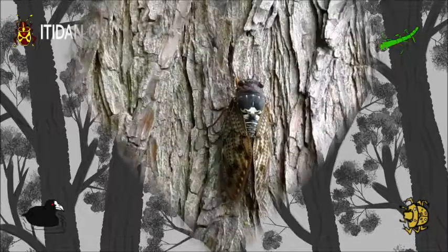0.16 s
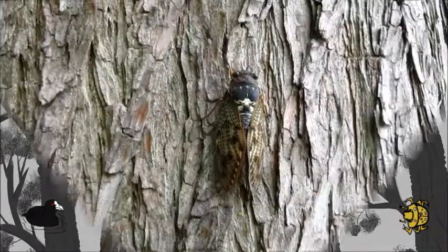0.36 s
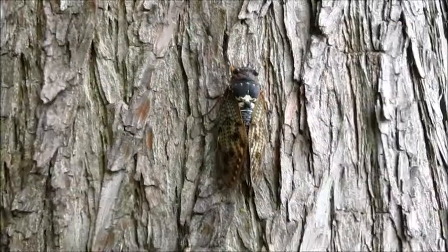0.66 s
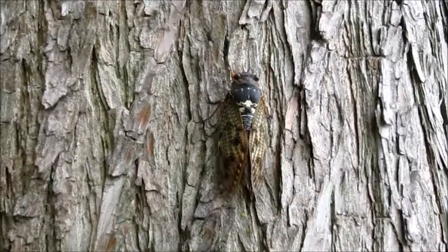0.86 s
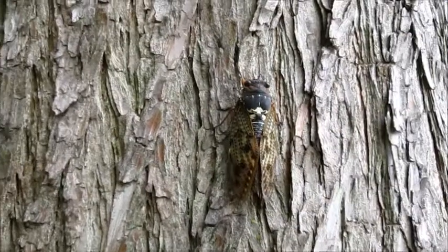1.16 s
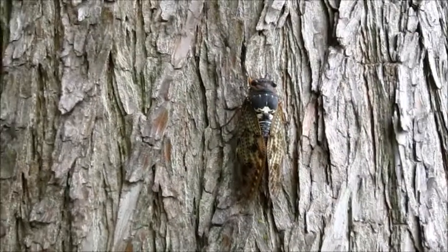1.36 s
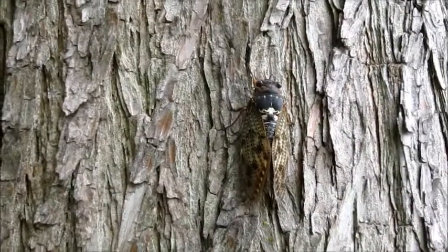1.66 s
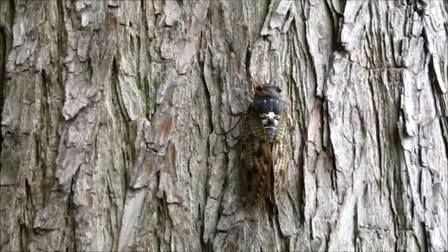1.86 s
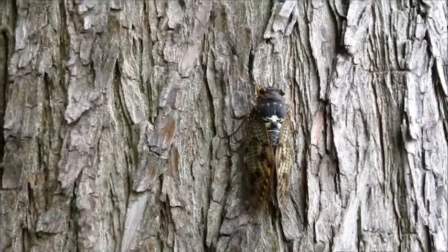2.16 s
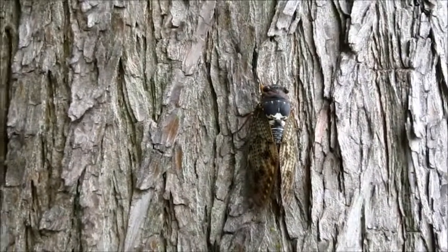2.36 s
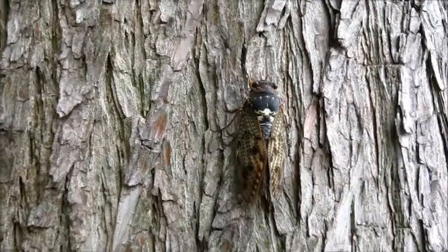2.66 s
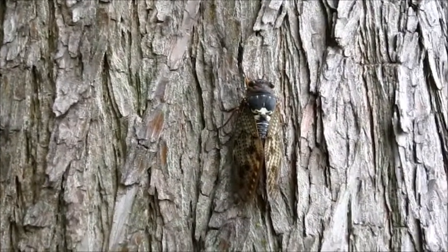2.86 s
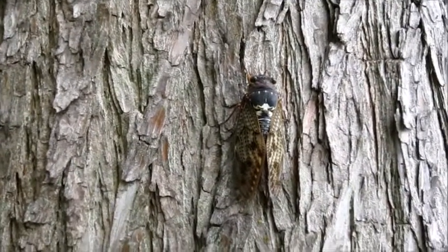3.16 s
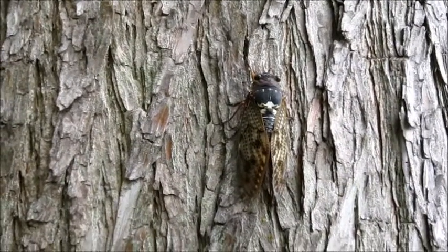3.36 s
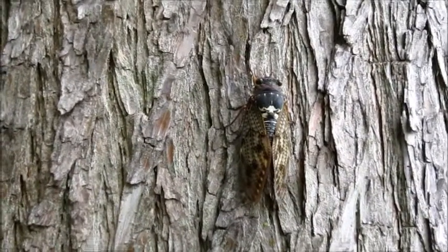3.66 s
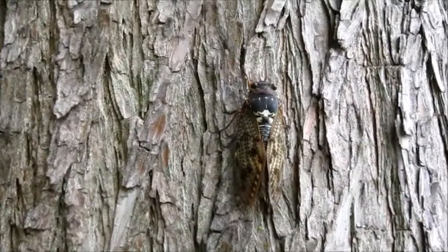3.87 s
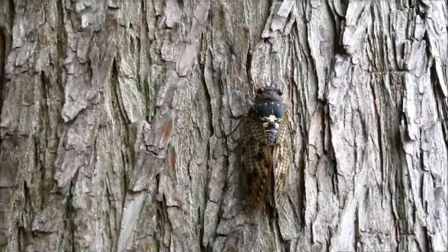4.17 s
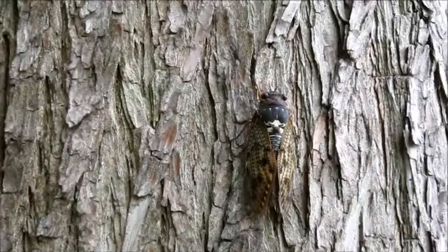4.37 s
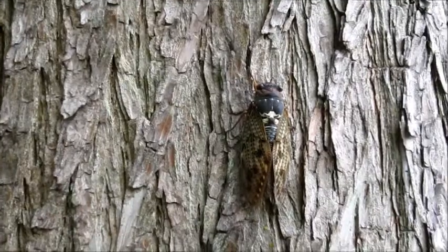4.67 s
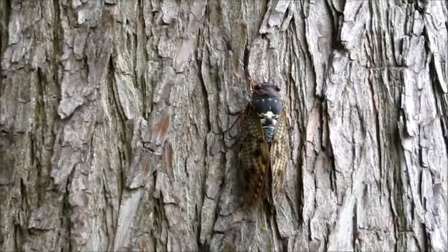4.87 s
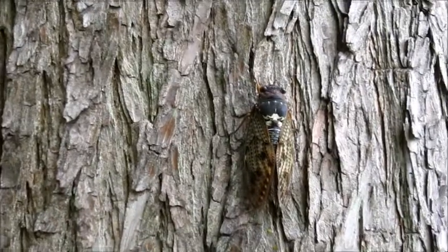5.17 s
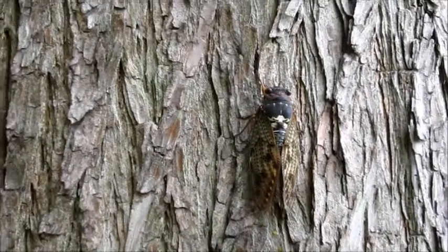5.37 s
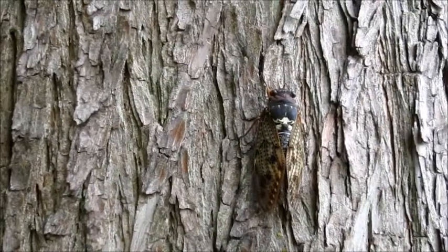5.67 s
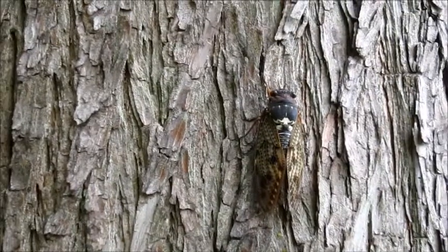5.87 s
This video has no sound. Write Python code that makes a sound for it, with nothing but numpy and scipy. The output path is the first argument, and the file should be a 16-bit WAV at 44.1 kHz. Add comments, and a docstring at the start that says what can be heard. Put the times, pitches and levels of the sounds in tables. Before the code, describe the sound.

A cicada's loud hissing buzz fades in on a nearby tree trunk, pulsing rapidly, with another cicada chanting more slowly in the distance.

```python
"""A cicada sings close by on a tree trunk: the ribs of its tymbals buckle and excite its body in a dense
sizzle, with sharp ticks whose ring sweeps up and down as the abdomen throbs 15 times a second.
A second cicada chants slower syllables further off, over outdoor rumble, a distant car and a thin whine.
These swell in together and ease off; one soft tap sounds early and a high hiss joins late."""
import sys
import numpy as np
from scipy import signal
from scipy.fft import rfft, irfft
from scipy.io import wavfile
from scipy.ndimage import uniform_filter1d

SR = 44100
rng = np.random.default_rng(int(sys.argv[2]) if len(sys.argv) > 2 else 0)


def output_pcm(signal):
    """Save a mono or channel-first signal as 16-bit PCM at the path in sys.argv[1].

    Samples are clipped to [-1, 1] before scaling.
    """
    pcm = np.clip(np.atleast_2d(signal).T, -1, 1) * 32767
    wavfile.write(sys.argv[1], SR, np.round(pcm).astype(np.int16))


N = 266099
TIME = np.arange(N) / SR


def undb(db):
    """Amplitude ratio: a factor of ten for every 20 dB."""
    return 10 ** (np.asarray(db) / 20)


def level(x, db):
    """Normalisation to an rms level."""
    return x * undb(db) / np.sqrt(np.mean(x ** 2))


def walk(rate):
    """Low-pass noise: a smooth random drift with a spread near 1."""
    hold = max(int(SR / rate), 1)
    steps = np.repeat(rng.standard_normal(N // hold + 1), hold)
    return 1.3 * uniform_filter1d(uniform_filter1d(steps, hold), hold)[:N]


def beat(hz, drift_hz_per_s, first_s=0):
    """Phase in turns, the integral of a steadily drifting rate; a whole number at each beat."""
    elapsed = TIME - first_s
    return hz * elapsed + drift_hz_per_s * elapsed ** 2 / 2


def wraps(turns):
    """The times at which a rising phase completes each cycle."""
    return np.interp(np.arange(np.ceil(turns[0]), turns[-1]), turns, TIME)


def colour(x, points, size=4096):
    """Minimum-phase filter through (frequency [Hz], gain [dB]) points, by folding the cepstrum."""
    hz, db = np.transpose(points)
    bins = np.maximum(np.fft.rfftfreq(size, 1 / SR), 1)
    gain = undb(np.interp(np.log(bins), np.log(hz), db))
    cepstrum = irfft(np.log(gain))
    cepstrum[1:size // 2] *= 2
    cepstrum[size // 2 + 1:] = 0
    impulse_response = irfft(np.exp(rfft(cepstrum)))
    return signal.fftconvolve(x, impulse_response)[:N]


def resonate(x, modes):
    """Parallel fourth-order resonators, each (frequency [Hz], bandwidth [Hz], gain [dB])."""
    out = 0
    for hz, width, db in modes:
        b, a = signal.iirpeak(hz, hz / (1.55 * width), SR)
        out = out + undb(db) * signal.lfilter(b, a, signal.lfilter(b, a, x))
    return out


def high_pass(x, hz):
    """Third-order high-pass: 18 dB per octave of attenuation below hz."""
    return signal.sosfilt(signal.butter(3, hz, "high", fs=SR, output="sos"), x)


def rings(times, size, hz, decay_s, count=384):
    """Free vibration: each impulse starts an exponentially damped sinusoid."""
    index = (times * SR).astype(int)[:, None] + 1 + np.arange(count)
    age = index / SR - times[:, None]
    wave = size[:, None] * np.exp(-age / decay_s) * np.sin(2 * np.pi * hz[:, None] * age)
    return np.bincount(np.clip(index, 0, N).ravel(), wave.ravel(), N + 1)[:N]


def rib_clicks(rate_hz=720, unevenness=.55, scatter_db=.5):
    """Buckling instability: ribs give way at uneven intervals, each with one impulse."""
    times = wraps(np.cumsum(rate_hz * np.exp(unevenness * walk(rate_hz))) / SR)
    polarity, scatter = rng.standard_normal((len(times), 2)).T
    size = np.sign(polarity) * undb(scatter_db * scatter)
    return level(np.bincount((times * SR).astype(int), size, N), 0)


def sizzle(stretch):
    """Impulse excitation: clicks ring the body near 6 kHz and the ribs an octave up."""
    # response of the near cicada's body: (frequency [Hz], gain [dB])
    body_response = [(1500, -47), (2100, -26.5), (2600, -16.5), (3300, -16.5), (3900, -19), (4500, -12),
                     (5100, -4.5), (5800, -0.5), (6500, -5), (7200, -10.5), (8600, -19), (9700, -21.5),
                     (12000, -14.5), (16000, -42.5)]
    # response of its thin tymbal ribs: (frequency [Hz], gain [dB])
    rib_response = [(5000, -32), (8500, -16), (9800, -13), (11000, -2), (12100, 1.5), (13300, 0),
                    (14500, 1), (15700, -7)]
    clicks = rib_clicks()
    # the added noise stands for a wash of reflections
    body = colour(clicks + level(rng.standard_normal(N), -2), body_response)
    ribs = colour(clicks + level(rng.standard_normal(N), .8), rib_response)
    # the body gives a little less while the abdomen is stretched
    return level(body * undb(-.7 * stretch + .42 * walk(22.02)), -.17) + level(ribs, -4.5)


def ticks(throb, rest_hz=12600, sweep_hz=2500, lag_turns=.61, weak_db=-5, depth_db=14, half_width=.335):
    """Tension tuning: two tymbals snap in turn, ringing higher and louder as the abdomen stretches."""
    turns = beat(hz=185, drift_hz_per_s=.75)  # the tymbal muscles slowly speed up
    high, low = 0, 0
    for offset, db in ((0, 0), (lag_turns, weak_db)):
        times = wraps(turns - offset)
        jitter, detune, scatter = rng.standard_normal((len(times), 3)).T
        phase = (np.interp(times, TIME, throb) + .5) % 1 - .5
        stretch = np.exp(-np.abs(phase / half_width) ** 4)
        times = times + .00003 * jitter
        hz = rest_hz + sweep_hz * stretch + 200 * detune
        size = undb(db + 1.7 * scatter)
        high = high + rings(times, size * undb(depth_db * stretch), hz, decay_s=.0002)
        # a weaker mode about an octave below sweeps along
        low = low + rings(times, size, 5850 + 2400 * np.cos(np.pi * phase) ** 4, decay_s=.00066)
    # the membrane radiates best near 15 kHz
    return level(resonate(high, [(15200, 3070, 0)]), -6.5) + level(high_pass(low, 4600), -11.5)


def near_cicada(bark_delay_s=.002198, bark_db=-19):
    """Comb filtering: the throbbing song interferes with its one reflection from the bark."""
    throb = beat(hz=15.13, drift_hz_per_s=-.039, first_s=.0515)  # the abdomen slowly tires
    song = sizzle(stretch=np.cos(2 * np.pi * throb)) + ticks(throb)
    reflection = np.pad(song, (round(bark_delay_s * SR), 0))[:N]
    return song + undb(bark_db) * reflection


def chant(turn, half_width=.24, growth_db_per_s=.97):
    """Source and filter: a pulse train, rising in pitch in each syllable, drives fixed resonances."""
    # resonances of the far cicada: (frequency [Hz], bandwidth [Hz], gain [dB])
    modes = [(2390, 146, 1), (2703, 140, 1), (3027, 400, 6.5), (3330, 410, -1)]
    phase = (turn + .5) % 1 - .5  # zero in mid-syllable
    buzz_hz = 343 + 72 * phase + 2.48 * walk(60)
    times = wraps(np.cumsum(buzz_hz) / SR)
    size = undb(1.3 * rng.standard_normal(len(times)))
    pulses = level(rings(times, size, hz=np.full(len(times), 3000), decay_s=.00008), 0)
    syllable = np.exp(-np.abs(phase / half_width) ** 6) * undb(1.9 * phase)
    buzz = (pulses + level(rng.standard_normal(N), -3)) * syllable
    lowest_mode = resonate(buzz, modes[:1]) * undb(growth_db_per_s * TIME)
    return level(lowest_mode + resonate(buzz, modes[1:]), -17)


def rasp(turn, clicks_per_s=1500):
    """Shot noise: between syllables, random clicks merge into a band whose pitch climbs."""
    # overtone of the rasp: (frequency [Hz], bandwidth [Hz], gain [dB])
    overtone_band = [(8820, 750, 1)]
    times = np.sort(rng.uniform(0, TIME[-1], int(clicks_per_s * TIME[-1])))
    phase = np.interp(times, TIME, turn) - .55  # zero in mid-rasp
    size = np.exp(-(phase / .19) ** 2)
    clicks = rings(times, size, hz=4530 + 1400 * phase, decay_s=.00095)
    band = high_pass(clicks, 3540) * undb(.87 * walk(6.1))
    overtone = resonate(rng.standard_normal(N), overtone_band) * np.exp(-((turn - .57) / .193) ** 2)
    return level(band, -14.5) + level(overtone, -25)


def far_cicada(echo_decay_s=.023, echo_db=-17.5):
    """Reverberation: scattering from trees smears the alternating chant and rasp."""
    turn = beat(hz=5.537, drift_hz_per_s=.028, first_s=.150) % 1
    direct = chant(turn) + rasp(turn)
    echoes = rng.standard_normal(SR // 2) * np.exp(-TIME[:SR // 2] / echo_decay_s)
    return direct + level(signal.fftconvolve(direct, echoes)[:N], echo_db)


def rumble(relative_db=-13.5):
    """Coloured noise: distant traffic and air carry most power at low frequencies."""
    # spectrum of the outdoor air: (frequency [Hz], relative density [dB])
    air_spectrum = [(15, -12), (30, -1.5), (60, 1), (125, -1), (170, -9), (260, -12), (380, -15.5),
                    (500, -13), (700, -19), (980, -16.5), (1250, -19.5), (1800, -23.5), (3000, -32.5),
                    (8000, -50)]
    air = colour(rng.standard_normal(N), air_spectrum, size=16384)
    return level(air, relative_db) * undb(.92 * walk(4.08))


def car(nearest_db=-24, passes_s=1.6, speed_m_s=16.5, road_m=15.3):
    """Spherical spreading: the tyre noise of a passing car falls inversely with distance."""
    distance_m = np.hypot(road_m, speed_m_s * (TIME - passes_s))
    tyres = resonate(rng.standard_normal(N), [(944, 160, 0)])
    return level(tyres, nearest_db) * road_m / distance_m


def whine():
    """Random modulation: two tones of a distant machine waver slightly in pitch and level."""
    # tones of the machine: (frequency [Hz], relative level [dB])
    tones = [(1304, -30.5), (1424, -39.5)]
    out = 0
    for hz, db in tones:
        turns = np.cumsum(hz + 1.09 * walk(8)) / SR
        out = out + level(np.sin(2 * np.pi * turns) * undb(.22 * walk(6.3)), db)
    return out


def tap():
    """Strong damping: one soft, dull knock dies within a few cycles."""
    # the knock: (time [s], level [dB], frequency [Hz], decay time [s])
    knocks = [(.308, -34.5, 850, 0.0013)]
    return sum(rings(np.array([s]), undb([db]), np.array([hz]), decay) for s, db, hz, decay in knocks)


def hiss(relative_db=-16, start_s=3.73, attack_s=.25):
    """Narrow-band noise: a thin high hiss, perhaps another insect, sets in and holds."""
    band = resonate(rng.standard_normal(N), [(8400, 950, 0)])
    attack = np.clip((TIME - start_s) / attack_s, 0, 1)
    return level(band, relative_db) * attack


def swell(top_db=-21, start_s=.01, rise_s=2.233, bend=1.235, hold_until_s=4.94, fall_s=2.17):
    """Amplitude envelope: it grows out of silence, sags slightly, then eases off."""
    rise = np.clip((TIME - start_s) / rise_s, 0, 1) ** bend
    fall = np.clip(1 - (TIME - hold_until_s) / fall_s, 0, 1)
    sag_db = .45 * np.maximum(TIME - rise_s, 0)
    return rise * fall * undb(top_db - sag_db)


def scene():
    """Superposition, alike left and right; all levels but the tap's are relative to the swell."""
    sustained = near_cicada() + far_cicada() + hiss() + rumble() + car() + whine()
    mono = sustained * swell() + tap()
    return np.array([mono, mono])


def record(dry):
    """Frequency response of the microphone: one deep notch and a steep low-pass."""
    notch_hz, notch_width_hz, top_hz = 7876, 1630, 15750
    notched = signal.lfilter(*signal.iirnotch(notch_hz, notch_hz / notch_width_hz, SR), dry)
    return signal.sosfilt(signal.ellip(12, .2, 80, top_hz, fs=SR, output="sos"), notched)


dry = scene()
out = record(dry)
output_pcm(out)
```